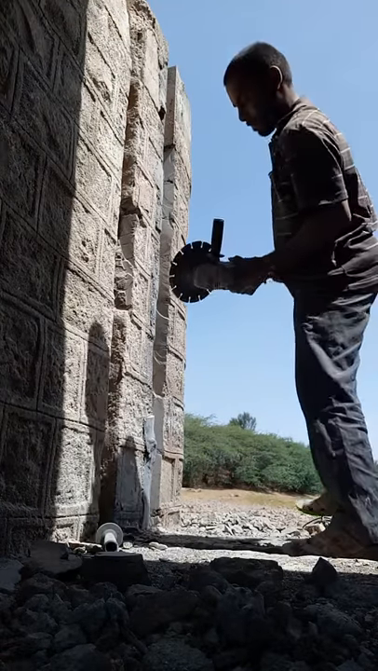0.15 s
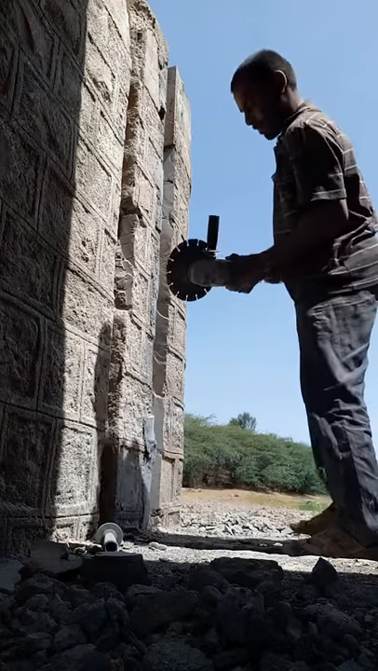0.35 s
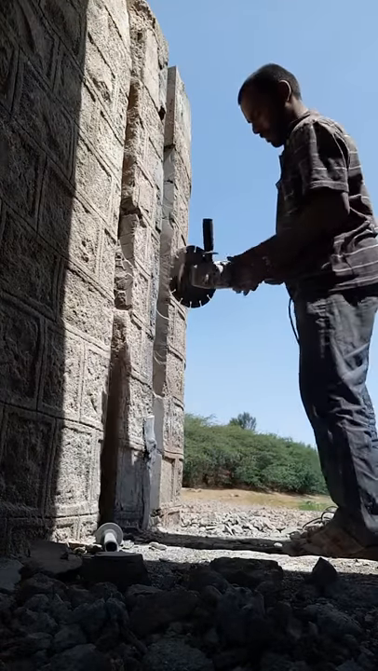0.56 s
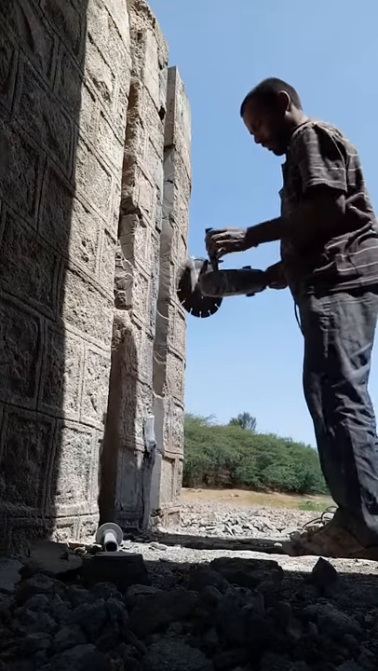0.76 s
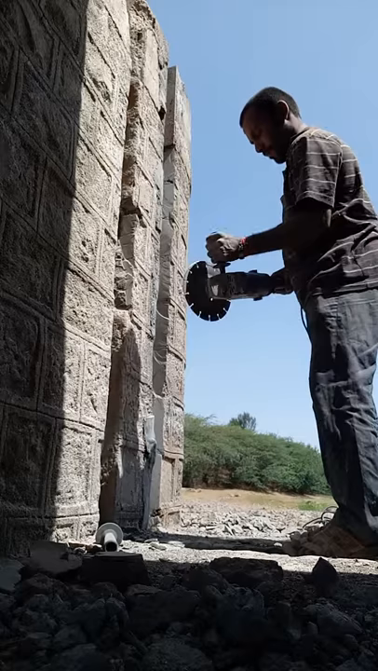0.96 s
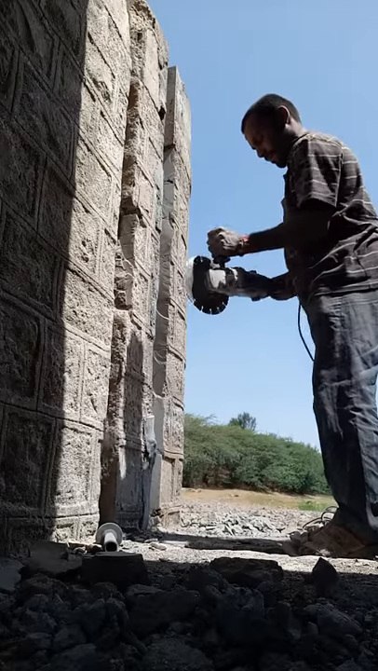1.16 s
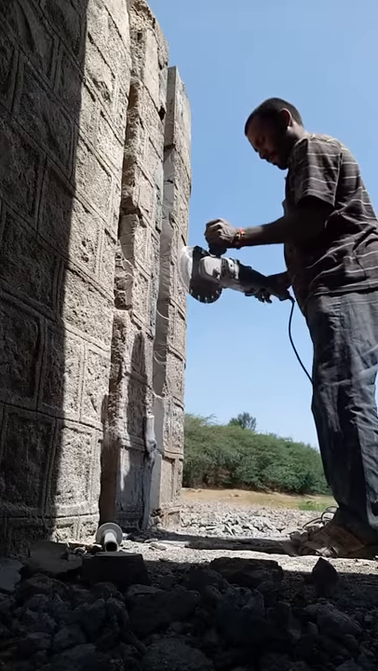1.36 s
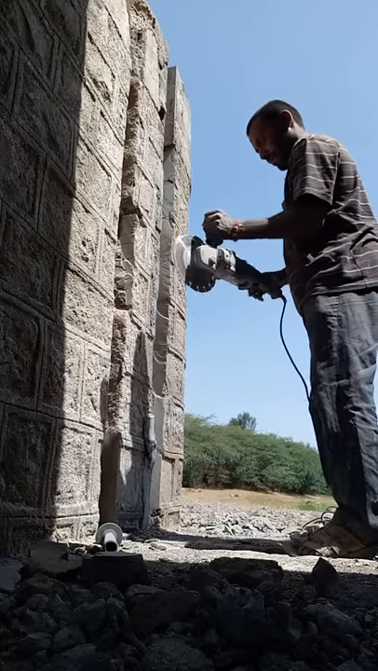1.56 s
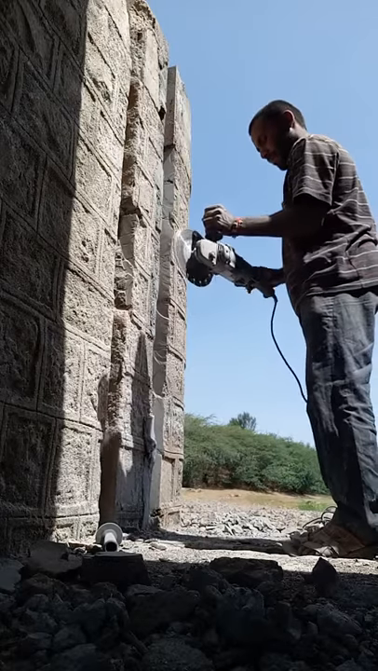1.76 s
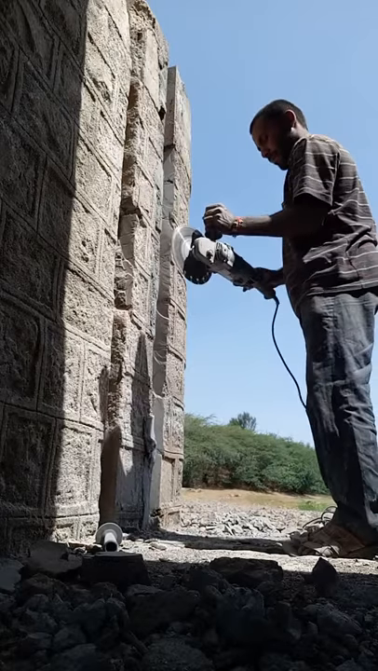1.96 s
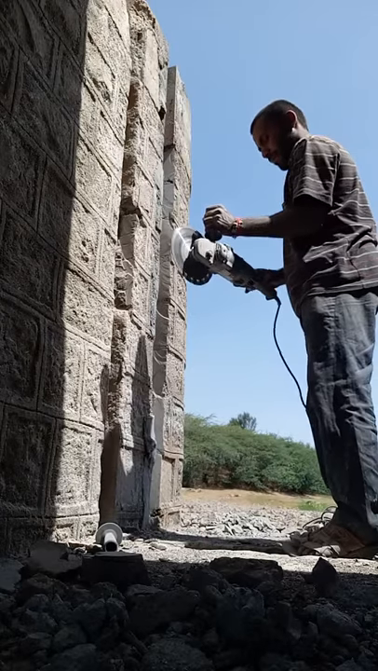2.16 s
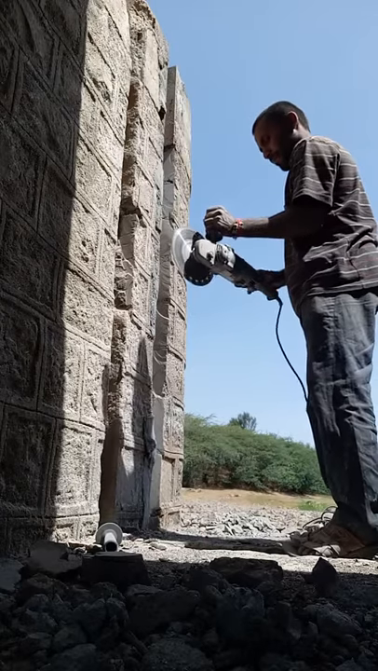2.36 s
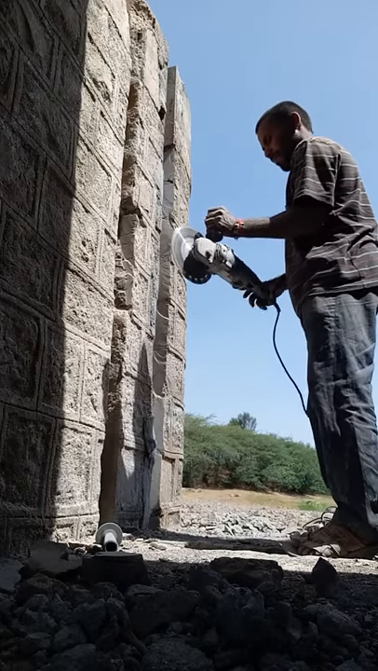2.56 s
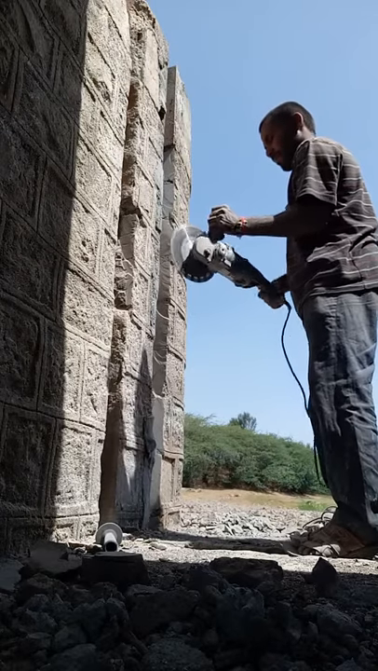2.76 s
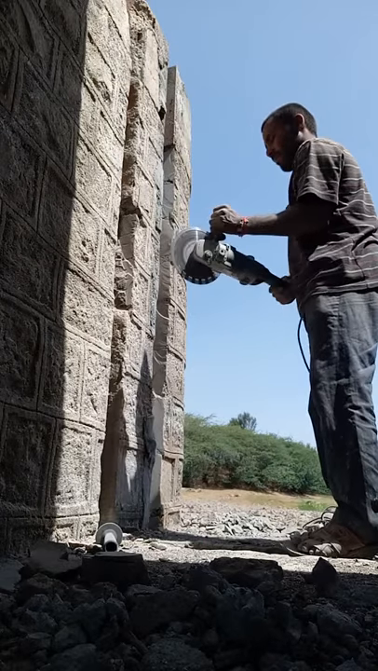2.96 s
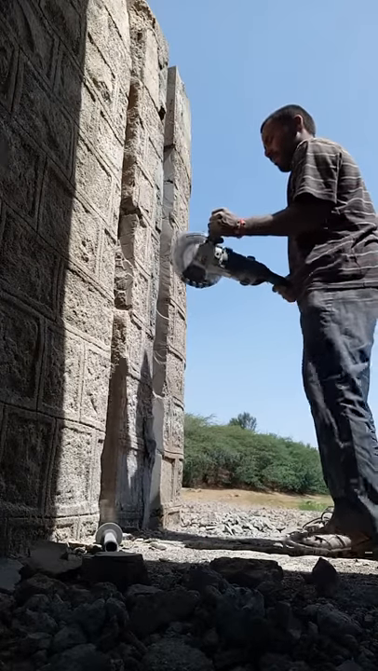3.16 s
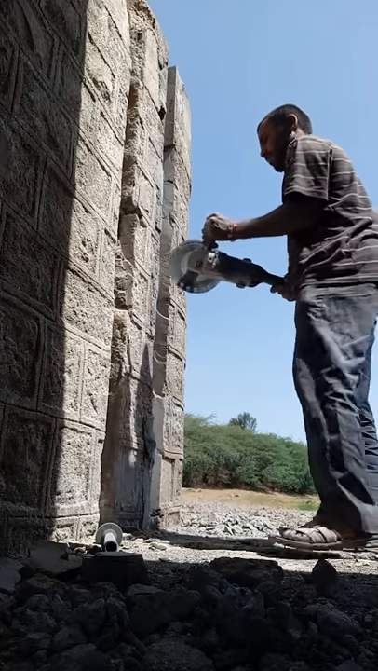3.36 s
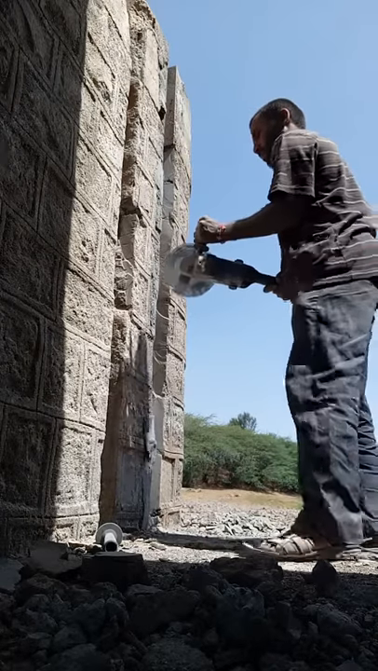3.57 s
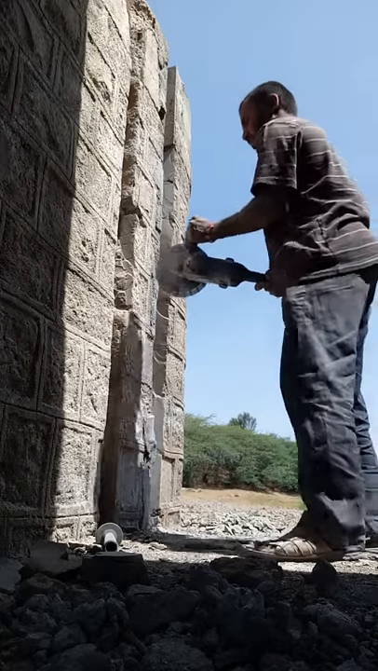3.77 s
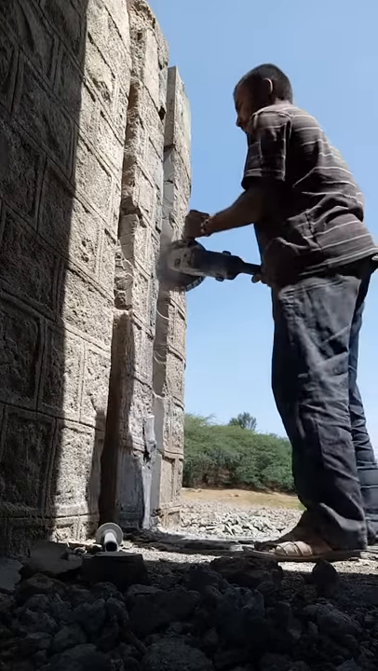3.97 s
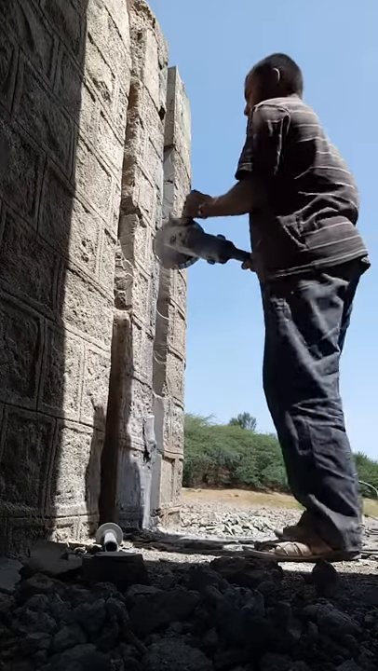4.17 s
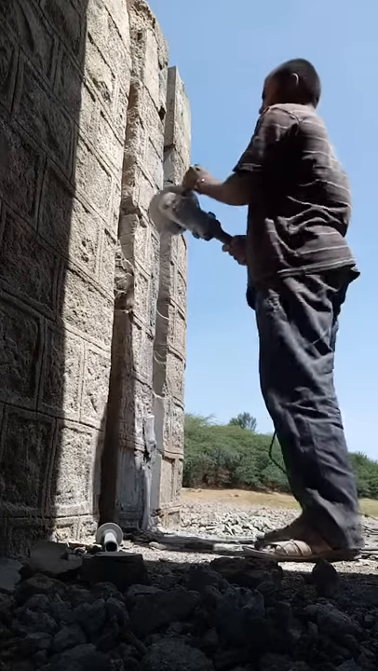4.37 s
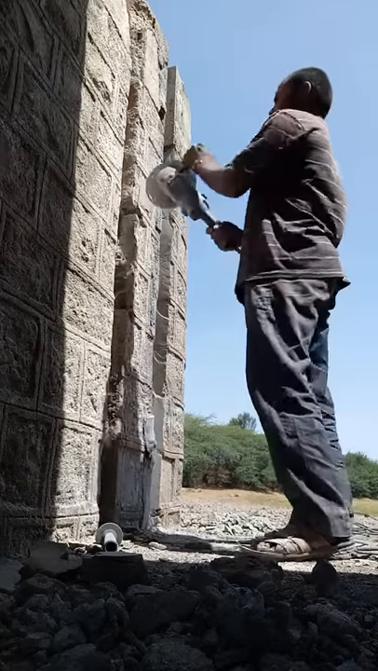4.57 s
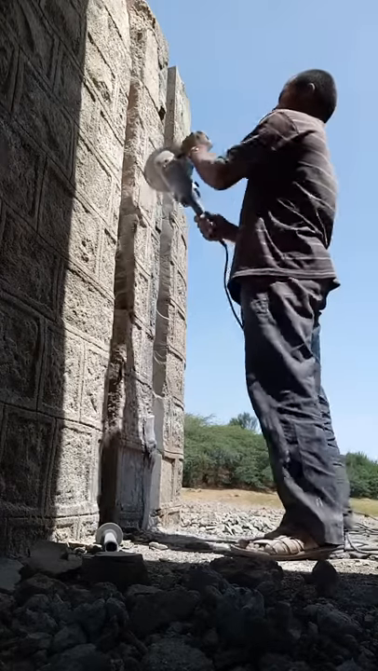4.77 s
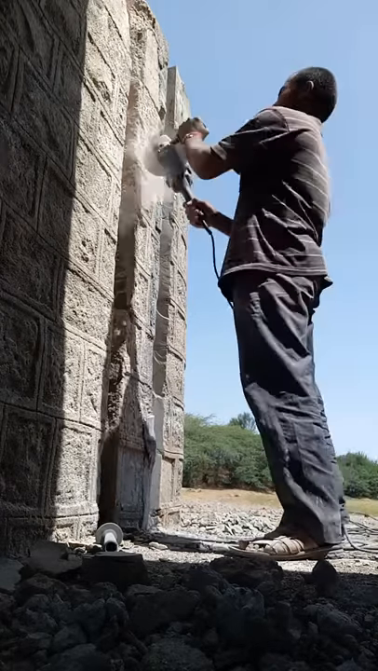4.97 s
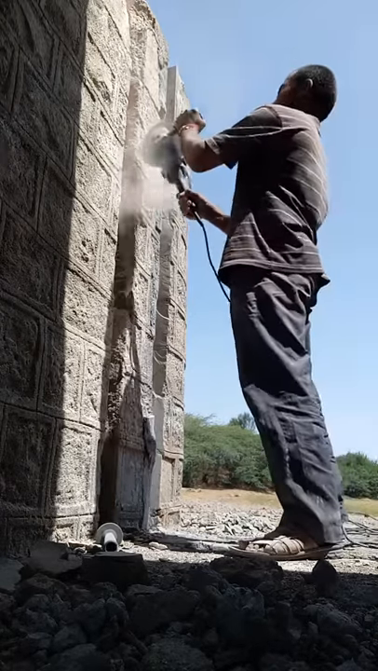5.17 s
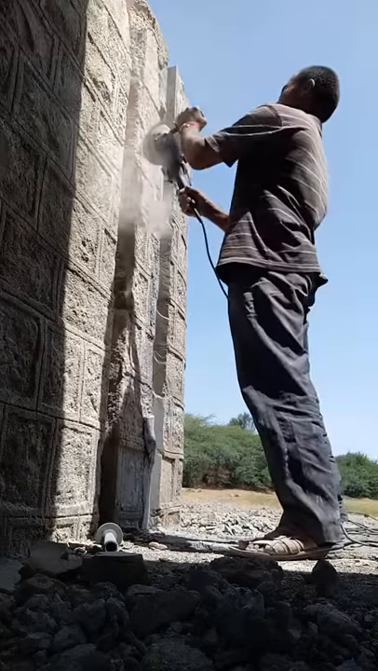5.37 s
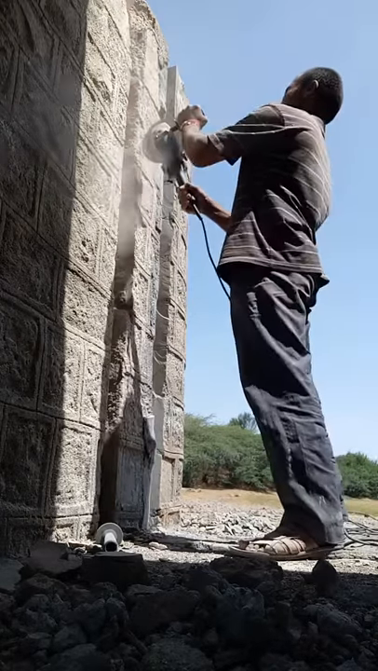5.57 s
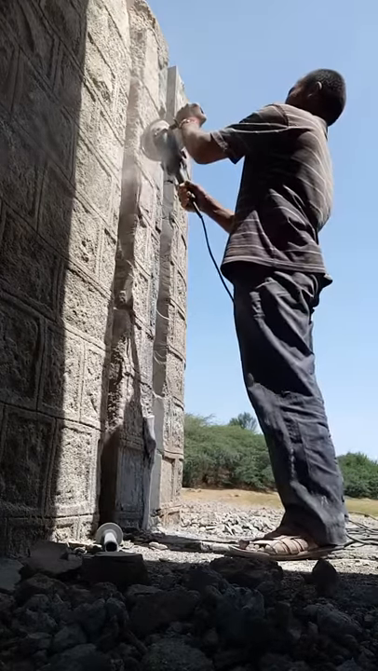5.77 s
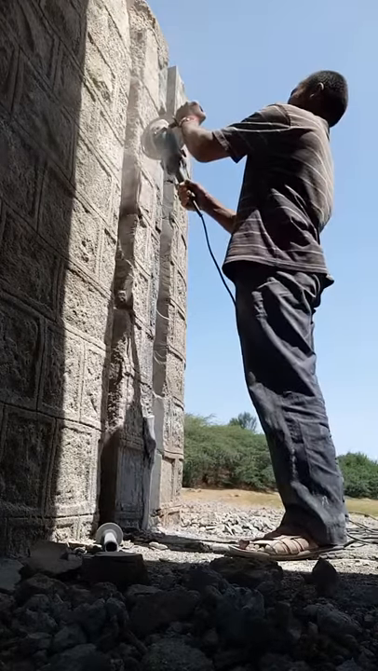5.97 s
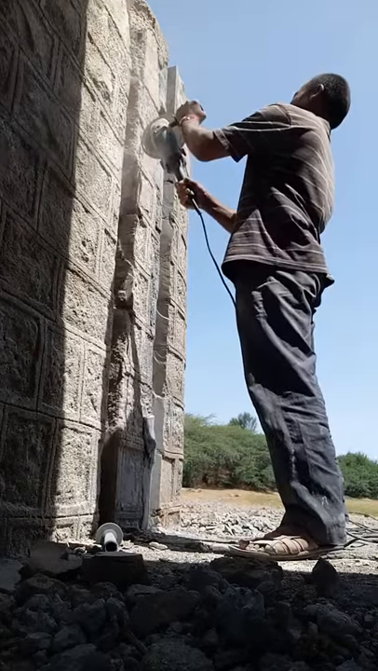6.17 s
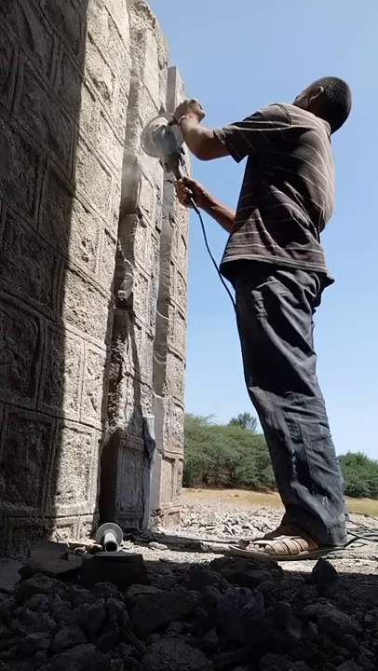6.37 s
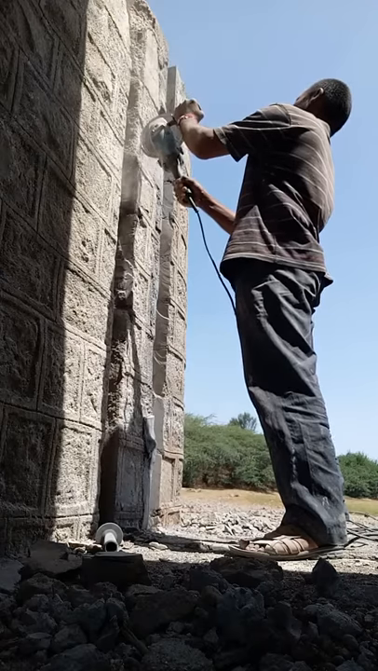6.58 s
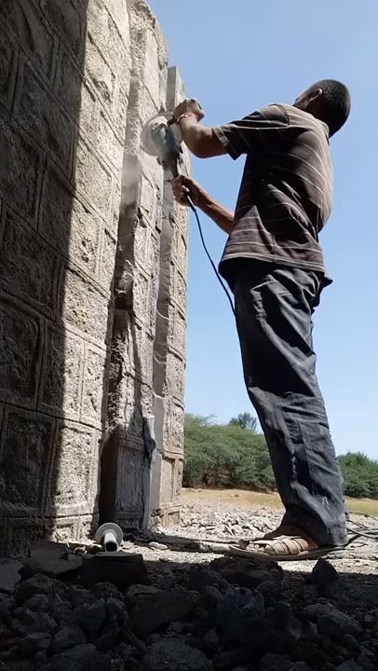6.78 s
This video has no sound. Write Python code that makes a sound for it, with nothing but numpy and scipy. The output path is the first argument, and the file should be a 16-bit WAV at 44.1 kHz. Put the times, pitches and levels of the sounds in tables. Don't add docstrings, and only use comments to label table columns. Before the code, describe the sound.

Close, mono outdoor sound: muted shuffling, small hollow knocks on a tool and one gravel crunch come and go through a noise gate. A crisp switch click starts an electric saw with a growling, stuttering shudder and brief guard buzz. It whines up into a bright airy roar, its steel disc brushes stone three times with ringing hisses, then bites loudly at the very end.

```python
import sys
import numpy as np
from scipy import signal
from scipy.fft import rfft, irfft, next_fast_len
from scipy.io import wavfile

SR = 44100
rng = np.random.default_rng(int(sys.argv[2]) if len(sys.argv) > 2 else 0)


def voltage_ratio(decibels):
    exponent = np.asarray(decibels, float) / 20
    return 10 ** exponent


def to_wav(sig):
    pcm = np.clip(np.atleast_2d(sig), -1, 1) * 32767
    pcm = np.round(pcm).astype(np.int16)
    wavfile.write(sys.argv[1], SR, pcm.T)


N = 300321
T = np.arange(N) / SR
SWITCH_S = 1.139


def motor():
    breakaway_s, run_up_s, run_up_bend, top_turns_hz = 1.548, 1.2934, 0.838, 447.4
    speed = 1 - np.exp(-(np.maximum(T - breakaway_s, 0) / run_up_s) ** run_up_bend)
    turns = top_turns_hz * speed
    phase = 2 * np.pi * np.cumsum(turns + 0.204 * drift(4.2)) / SR
    boom_db, rattle_db, rush_db, hiss_db = efforts(speed)
    sound = gears(speed, boom_db, rattle_db)
    sound = sound + fan(phase) * voltage_ratio(rush_db + 1)
    sound = sound + sparks(hiss_db)
    sound = sound + rotor_tones(turns, phase)
    sound = sound + stalled_hum() + handle(speed)
    held_down_db = -9 * during(BITE[0][0], 9, edge=0.049)
    return during(SWITCH_S, 9, edge=0.004) * voltage_ratio(held_down_db) * sound


# t/s, level/dB
SHAKE = [(1.15, -19.5), (1.21, -18.5), (1.48, -17.5), (1.5, -23), (1.6, -16.5), (1.64, -27), (1.98, -25.5),
         (2.03, -17), (2.14, -21.5), (2.56, -21), (3.43, -26.5), (3.51, -33.5), (4.69, -28), (4.72, -32.5),
         (4.89, -24), (5.02, -38), (6.09, -34), (6.8, -54)]
# t/s, level/dB, half width/s
FALTERS = [
    (1.2, 2.5, 0.28),
    (1.49, -7.5, .05),
    (1.63, -14, 0.016),
    (1.88, -6.5, 0.052),
]


def efforts(speed):
    shake = in_time(SHAKE) + 25
    sag = sum(db * swell(s, half) for s, db, half in FALTERS)
    jolt = sum(swell(s + 0.024, 0.04) for s, *_ in BRUSHES[:3])
    jolt = jolt + 1.1 * during(BITE[0][0], 9, edge=0.041)
    mesh_db = -10.5 * step_at(speed, 0.864, 0.0083)
    boom_db = -22.5 + 0.99 * shake
    rattle_db = -23 + 0.2 * shake + mesh_db + 8.5 * jolt
    rush_db = -32.5 + 11 * speed ** 1.2 + sag
    hiss_db = -54.5 + 17 * step_at(speed, 0.53, 0.075) + 1.6 * sag
    return boom_db, rattle_db, rush_db, hiss_db


# f/Hz, width/Hz, level/dB
BOOM = [(788, 98, -15.5), (1004, 364, -18.5), (1106, 34, -7), (1179.5, 17, 1.5), (1229, 25.5, 4.5),
        (1364, 42, -8), (677, 17, -20)]
# f/Hz, width/Hz, level/dB
CASE = [(2460, 21, -13), (3025, 63, -5), (3230, 45, 1.5), (3393, 73, 1.5), (3609, 13.6, 4), (3768, 32, 0),
        (3980, 39, -15), (4400, 200, -10), (6550, 23, 1), (6800, 94, -8), (7170, 74, -8.5),
        (10200, 34, -20.5), (11700, 450, -28), (1930, 20, -18.5)]
# f/Hz, density/dB per Hz
RATTLE = [(35, -87), (60, -89), (201, -12), (535, -23), (1070, -28), (1210, -10.5), (1630, 4), (2660, -1.5),
          (3280, 0), (4440, -17), (6750, -79), (7760, -67), (15600, -72)]


def gears(speed, boom_db, rattle_db):
    torque_pulses = np.exp(-(T - SWITCH_S) / 0.5) * np.cos(2 * np.pi * 99.6 * T)
    teeth = grit(5000, 2.52) * (1 + 0.68 * torque_pulses)
    stiffen_db = 13
    stiff_db = stiffen_db * speed ** 3
    housing = resonate(teeth * voltage_ratio(-stiff_db / 2), BOOM[:4], flicker_db=1.2)
    housing = housing + resonate(teeth, BOOM[4:], flicker_db=1.2)
    housing = housing - resonate(teeth * voltage_ratio(stiff_db - stiffen_db / 2), [(1275, 57, -3)])
    boom = rms_one(low_pass(housing, 4, 1500)) * voltage_ratio(boom_db + 1.0)
    case = rms_one(resonate(teeth, CASE, flicker_db=2.5)) + voltage_ratio(-7) * coloured(teeth, RATTLE)
    return boom + case * voltage_ratio(rattle_db + 2.5)


# f/Hz, density/dB per Hz
RUSH = [(35, -70), (60, -49), (168, -23), (266, -21), (301, -21), (697, -9), (1150, -3.5), (2210, -7.5),
        (5220, -5.5), (6170, 2), (9000, -25.5), (11700, -55), (19800, -120)]
# f/Hz, width/Hz, level/dB
AIRWAY = [(837, 51, -2), (1264, 30, 9.5), (1766, 15, 8), (3640, 60, 10.5), (3797, 5.7, 17),
          (4186, 164, 11.5)]
# multiple of turns, width/Hz, level/dB
HUMPS = [(11.5, 220, -5.5), (13.5, 300, -4.5), (16.5, 480, -1)]


def fan(phase):
    air = coloured(grit(5000, 2.56), RUSH) * voltage_ratio(0.87 * drift(26))
    air = air + resonate(air, AIRWAY, flicker_db=2.0)
    for multiple, width, level_db in HUMPS:
        air = air + voltage_ratio(level_db) * drift(width) * np.cos(multiple * phase) * ramp(2.25, 0.24)
    play = [(4700, 520, -9)]   # f/Hz, width/Hz, level/dB
    pings = resonate(resonate(knocking(41), play), play)
    return air + rms_one(pings) * voltage_ratio(-9) * ramp(4.3, 0.64)


# f/Hz, density/dB per Hz
HISS = [(6000, -22.5), (7500, 0), (8500, -8.5), (10500, -1), (12000, -8), (13500, -11), (14600, 0.5),
        (15600, -3.5)]


def sparks(hiss_db):
    return coloured(grit(9000, 2.0), HISS) * voltage_ratio(hiss_db + 7.5 + 1.0 * drift(32))


# f/Hz, level/dB
WHINE = [(5000, -64), (7700, -49), (9600, -41), (10850, -31.5), (11550, -43), (12200, -38), (12480, -42),
         (12700, -37.5)]
# multiple of turns, level/dB
ORDER_DB = [(12, -55), (12.6, -55)]
# multiple of turns, level/dB off resonance, f/Hz, width/Hz, lift/dB
WOBBLE = [(1, -57, 342, 25, 14), (2, -62, 800, 35, 25)]


def rotor_tones(turns, phase):
    bars = 30
    tones = sum(voltage_ratio(db + 6.5 * drift(1.0)) * np.sin(k * phase) for k, db in ORDER_DB)
    for k, db, hz, width, lift_db in WOBBLE:
        swell_db = lift_db / (1 + ((k * turns - hz) / width) ** 2)
        tones = tones + voltage_ratio(db + swell_db + 2 * drift(5)) * np.sin(k * phase)
    whine_db = np.interp(bars * turns, *np.transpose(list(WHINE) + [(12760, -52)]))
    whine = voltage_ratio(whine_db + 2.5 + 2.7 * drift(12)) * np.sin(bars * phase)
    tones = tones + whine * during(0, 7.3, edge=0.33)
    return tones * ramp(2.3, 0.28)


# f/Hz, level/dB
HUM = [(199.2, -53), (398.4, -47.5), (699.8, -56), (796.7, -54), (952.8, -50)]


def stalled_hum():
    hum = sum(voltage_ratio(db + 2 + 1.3 * drift(9.1)) * np.sin(2 * np.pi * hz * T) for hz, db in HUM)
    return hum * during(1, 1.52, edge=0.1)


# f/Hz, width/Hz, level/dB
GRIP = [(269.7, 24, -46), (378, 30, -54)]


def handle(speed):
    level = voltage_ratio(26 - 3.1 * speed ** 4) * during(1.32, 9, edge=0.18)
    guard_takes_over = 1 - 0.75 * during(1.8, 1.97, edge=0.017)
    return resonate(grit(3000, 0.98), GRIP) * level * guard_takes_over


# t/s, level/dB, die-away t60/s, most excited f/Hz
BRUSHES = [
    (5.193, -25, 0.74, 14200),
    (5.808, -22, 0.36, 15200),
    (6.413, -23, 0.85, 15200),
    (6.413, -37, .6, 10300),
]
# t/s, level/dB
BITE = [
    (6.609, -19.5),
    (6.65, -17.5),
    (6.685, -16),
    (6.74, -21),
    (6.775, -12),
    (6.81, -17),
]
BLADE_HZ = [1280, 1755, 2256, 2702, 3171, 3562, 3769, 4269, 5076, 5397, 5630, 6050, 6855, 7340, 7665, 8370,
            8974, 9415, 10408, 10797, 11390, 11930, 12190, 12510, 13586, 14130, 14742, 15000, 15251, 15484]
BLADE_DB = [-8, -13, -12, -17, -9, -4, -6, -1, -18, -1, -9, 0, -5, -8, -10, -19.5, -10, -15, -13, -16, -16,
            -15, -19, -17, -10, -10, -11, -12, -5, -14]
# f/Hz, density/dB per Hz
SCRAPE = [(500, -19), (3000, -11), (7000, -1), (8800, -5), (10200, -1), (11800, -5), (13200, -12),
          (15300, -5)]


def blade():
    grains = grit(12000, 2.6)
    touches = np.array([struck(s, db, t60) for s, db, t60, hz in BRUSHES])
    bite = voltage_ratio(in_time(BITE) + 1.2 * drift(37)) * during(BITE[0][0], 9, edge=0.001)
    scrape_level = bite * voltage_ratio(-5.5) + touches.sum(axis=0) * voltage_ratio(-8)
    out = scrape_level * coloured(grains, SCRAPE)
    first = int(BRUSHES[0][0] * SR)
    for hz, mode_db in zip(BLADE_HZ, BLADE_DB):
        octaves_away = [abs(np.log2(hz / row[3])) for row in BRUSHES]
        near = voltage_ratio([max(-90 * octaves, -17) for octaves in octaves_away])
        force = voltage_ratio(16) * near @ touches[:, first:] + bite[first:] * voltage_ratio(2)
        width = 6 + 0.0021 * hz
        out[first:] += resonate(grains[first:] * force, [(hz, width, mode_db + 19.5 - hz / 4000)])
    return out


# f/Hz, width/Hz, level/dB
GUARD = [(6660, 38, 3), (6790, 36, 11), (6500, 21, 11), (7360, 58, -12), (7840, 27, -31), (8250, 40, -15),
         (9860, 310, -7.5), (10540, 150, -4), (12000, 74, -8), (11400, 150, -19), (12000, 55, -9)]
# f/Hz, width/Hz, level/dB
GUARD_BODY = [(10900, 1800, -14), (6750, 500, -10)]
# t/s, length/s, level/dB
CHATTERS = [
    (1.585, 0.028, -39),
    (1.647, .3, -29),
]


def guard_chatter():
    attack_s, release_s, sag_db_per_s = 0.0065, 0.047, -11
    start = CHATTERS[1][0]
    throbs_per_s = 39.3 - 16 * np.exp(-np.maximum(T - start, 0) / 0.04)
    since = np.cumsum((T > start) * throbs_per_s) / SR % 1
    throb = 0.28 + np.minimum(since / 0.093, 1) * np.exp(-since / 0.18) * voltage_ratio(1.2 * drift(23))
    level = np.zeros(N)
    for s, length, db in CHATTERS:
        fall = release_s if length > 0.1 else release_s / 5
        release = np.exp(-np.maximum(T - s - length, 0) / fall)
        level += voltage_ratio(db + sag_db_per_s * (T - s)) * ramp(s, attack_s) * release
    buzz = resonate(grit(7200, 4.7) * throb, GUARD + GUARD_BODY)
    buzz = rms_one(low_pass(buzz, 6, 12600))
    drone = voltage_ratio(-40.0 + 2.0 * drift(9.1)) * np.sin(2 * np.pi * 146 * T)
    return (buzz + drone) * level * voltage_ratio(9.5) * during(1.56, 2.03, edge=0.023)


# t/s, level/dB
SNAPS = [
    (.884, -44),
    (1.1306, -30),
    (1.138, -14),
]


def snaps():
    shape = sum(struck(s, db, 0.011) for s, db in SNAPS)
    spectrum = [(300, -34), (1200, 15), (6500, 7), (10000, -19), (15000, 3)]   # f/Hz, density/dB per Hz
    return shape * coloured(rng.standard_normal(N), spectrum)


# t/s, level/dB, bright part/dB
KNOCKS = [
    (0.0094, -62, -3),
    (0.179, -55, -17),
    (0.325, -55, -18),
    (0.438, -44, -23),
    (0.4714, -57, -22),
    (0.5128, -34.5, -23),
    (0.5423, -44, -26),
    (0.8853, -46, -17),
    (0.961, -42, -14.5),
]
# f/Hz, width/Hz, level/dB
TAP = [(1183, 22, 4), (1225, 18, 5.5)]


def housing_knocks():
    low, bright = np.zeros(N), np.zeros(N)
    for s, level_db, bright_db in KNOCKS:
        low[round(s * SR)] = voltage_ratio(level_db + 43)
        bright += struck(s, level_db + bright_db + 18.5, 0.25)
    rough = rng.standard_normal(N)
    case = CASE[:8] + CASE[-1:] + [(1000, 310, -2.5)]
    return resonate(low + 1e-18, TAP) + resonate(bright * rough + 1e-18, case)


# t/s, level/dB
CRUNCH = [
    (0.555, -44),
    (0.569, -39.5),
    (0.627, -55),
    (0.66, -72),
]


def footfall():
    stones = [(1640, 210, 4), (2050, 200, 5), (870, 610, -5), (2820, 720, -5), (347, 220, -7)]
    gravel = rms_one(resonate(grit(700, 1.8), stones))
    crunch = gravel * voltage_ratio(in_time(CRUNCH)) * during(0.557, 0.77, edge=0.004)
    ground = [(40, -5), (95, 10), (300, -14), (900, -38)]   # f/Hz, density/dB per Hz
    thud = voltage_ratio(-65) * swell(0.52, 0.044) * coloured(rng.standard_normal(N), ground)
    return crunch + thud


# f/Hz, density/dB per Hz
YARD = [(30, -13), (100, -2), (400, -10), (900, -8), (1220, -4), (1500, -6), (2000, -6.5), (3400, -12.5),
        (5000, -12), (6500, -6), (8000, -18), (13000, -21), (14800, -9), (15600, -18)]


def surroundings():
    low_db, mid_db, top_db = gated()
    ranges = [(-78, 15, 500), (low_db - 4.5, 500, 2500), (mid_db, 2500, 7500), (top_db, 8500, 30000)]
    yard = sum(voltage_ratio(db) * coloured(rng.standard_normal(N), YARD, lo_hz, hi_hz) for db, lo_hz, hi_hz in ranges)
    creaks = rms_one(resonate(grit(300, 3.8), BOOM + CASE[-1:] + [(1880, 90, -4)]))
    return yard + voltage_ratio(low_db - 3.0) * creaks


# t/s, length/s, level/dB, dull part/dB, bright part/dB
SHUFFLES = [
    (-.05, 0.17, -67, 5, -12),
    (.11, 0.21, -60, -8, -10),
    (.28, 0.18, -62.5, -6, -15),
    (.42, 0.29, -74, 14.5, -14),
    (0.564, 0.23, -58, -2, -8),
    (0.836, 0.22, -65, 0, 8),
    (1.084, 0.16, -73, 15, -2),
]


def gated():
    out = []
    for k, shut_db in enumerate((-72, -73.5, -86)):
        lifts = []
        for s, length, db, dull_db, bright_db in SHUFFLES:
            opening = ramp(s, 0.041) * np.clip((s + length - T) / 0.096, 0, 1)
            lifts.append(opening * max(db + (dull_db, 0, bright_db)[k] - shut_db, 0))
        out.append(shut_db + np.max(lifts, axis=0))
    return out


def rms_one(x):
    return x / np.sqrt(np.mean(x ** 2) + 1e-20)


def in_time(rows):
    return np.interp(T, *np.transpose(rows))


def ramp(start, rise):
    return np.clip((T - start) / rise, 0, 1)


def during(t0, t1, edge):
    return ramp(t0, edge) * np.clip((t1 - T) / edge, 0, 1)


def swell(centre, half):
    return np.exp(-((T - centre) / half) ** 2)


def struck(start, level_db, t60):
    return (T > start) * voltage_ratio(level_db - 60 * np.maximum(T - start, 0) / t60)


def step_at(x, centre, span):
    return 0.5 + 0.5 * np.tanh((x - centre) / span / 2)


def drift(rate):
    r = np.exp(-16 * np.pi * rate / SR)
    slow = signal.lfilter([1], [1, -2 * r, r * r], rng.standard_normal(N // 8 + 4002))[4000:]
    return np.interp(np.arange(N) / 8, np.arange(len(slow)), rms_one(slow))


def grit(per_s, spread_db):
    sizes = voltage_ratio(spread_db * np.minimum(rng.exponential(1, N), 5)) * rng.choice([-1, 1], N)
    return rms_one(sizes * (rng.random(N) < per_s / SR) + 1e-18)


def knocking(per_s):
    beats = np.diff(np.floor(np.cumsum(per_s * (1 + 0.12 * drift(5))) / SR), prepend=0)
    return beats * voltage_ratio(rng.normal(0, 3.0, N)) + 1e-18


def low_pass(x, order, hz):
    return signal.sosfilt(signal.butter(order, hz, fs=SR, output="sos"), x)


def coloured(x, spectrum, lo_hz=20, hi_hz=30000):
    size = next_fast_len(N)
    hz = np.arange(size // 2 + 1) * SR / size + 1
    points_hz, points_db = np.transpose(spectrum)
    gain = voltage_ratio(np.interp(np.log(hz), np.log(points_hz), points_db))
    gain = gain / np.sqrt((1 + (lo_hz / hz) ** 4) * (1 + (hz / hi_hz) ** 4))
    return rms_one(irfft(rfft(x, size) * gain, size)[:N])


def resonate(x, modes, flicker_db=0.):
    out = np.zeros(len(x))
    for k, (hz, width, level_db) in enumerate(modes):
        r, w = np.exp(-np.pi * width / SR), 2 * np.pi * hz / SR
        drive = x * voltage_ratio(flicker_db * drift(4.6)) if flicker_db else x
        zeros = np.array([1, 0, -1]) * (1 - r * r) / 2
        poles = [1, -2 * r * np.cos(w), r * r]
        out += (-1) ** k * voltage_ratio(level_db) * signal.lfilter(zeros, poles, drive)
    return out


def scene():
    tool = motor() + blade() + guard_chatter() + snaps() + housing_knocks()
    return (tool + footfall() + surroundings())[None, :]


def band_limit(x):
    return signal.sosfilt(signal.butter(12, 16840, fs=SR, output="sos"), x)


# t/s, level/dB, half width/s
DUCKS = [
    (1.50, -1.5, 0.014),
    (1.636, -2, 0.019),
    (1.962, -8, 0.0034),
    (2.93, -4, 0.012),
    (6.602, -6, 0.0046),
]


def record(dry):
    dips_db = sum(db * np.exp(-((T - s) / half) ** 4) for s, db, half in DUCKS)
    bump_s, bump_db, bump_hz = 6.783, -21.5, 240
    since = T - bump_s
    bump = voltage_ratio(bump_db) * np.exp(-(since * bump_hz * 3.2) ** 2) * np.cos(2 * np.pi * bump_hz * since - 0.6)
    loud = 0.64 * np.tanh((dry * voltage_ratio(dips_db) + bump) / 0.62)
    top_cut = signal.ellip(12, 0.5, 62, 15490, fs=SR, output="sos")
    mix = signal.sosfilt(top_cut, loud)
    return band_limit(mix)


dry = scene()
out = record(dry)
to_wav(out)
```